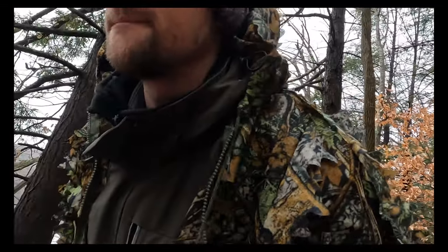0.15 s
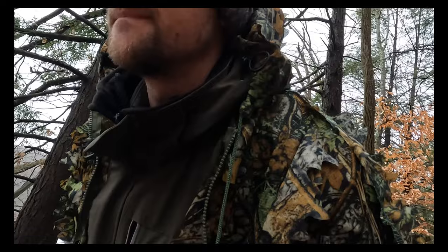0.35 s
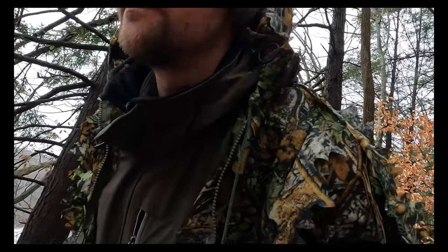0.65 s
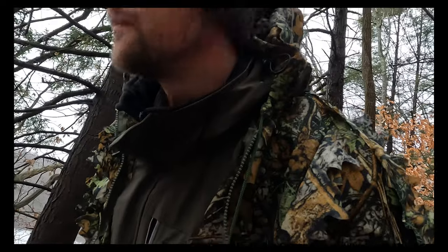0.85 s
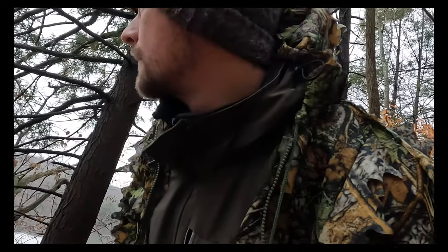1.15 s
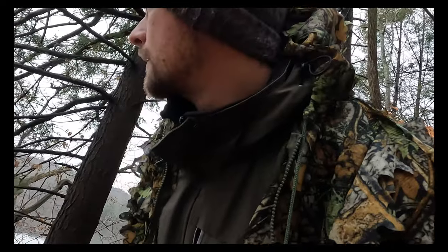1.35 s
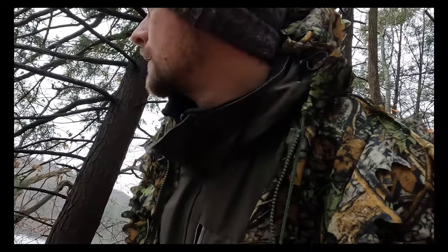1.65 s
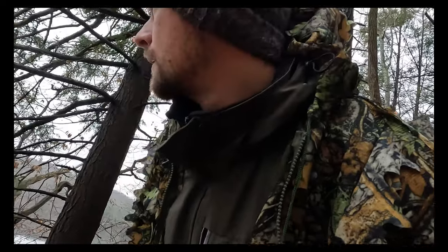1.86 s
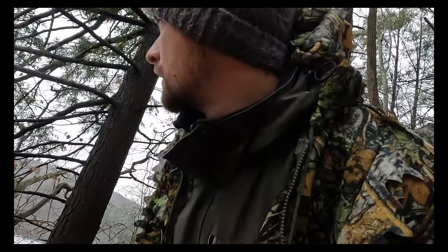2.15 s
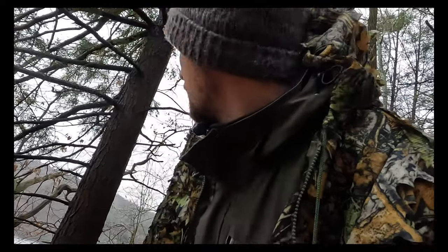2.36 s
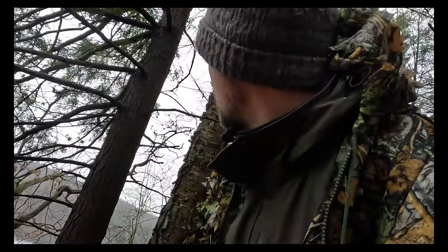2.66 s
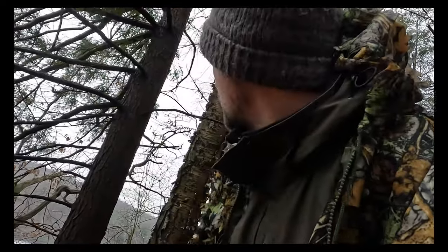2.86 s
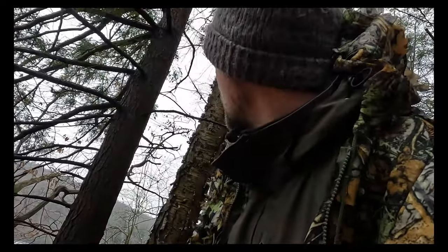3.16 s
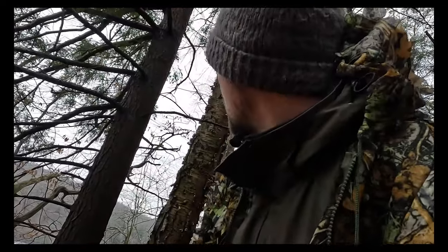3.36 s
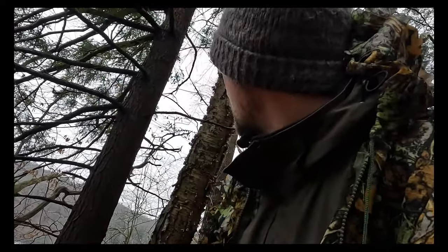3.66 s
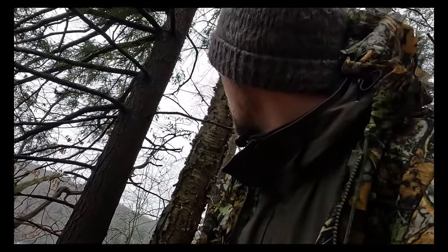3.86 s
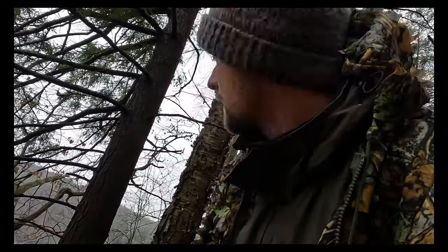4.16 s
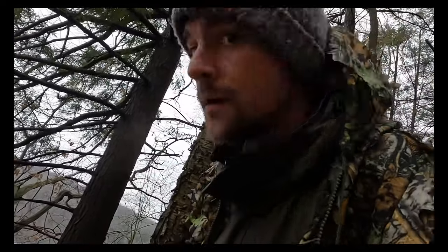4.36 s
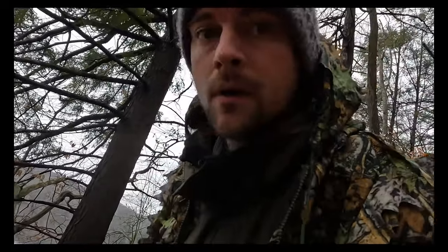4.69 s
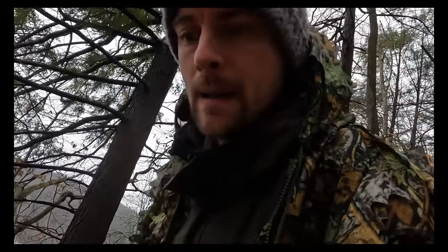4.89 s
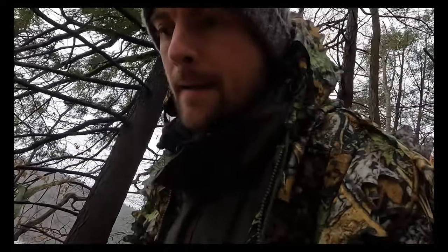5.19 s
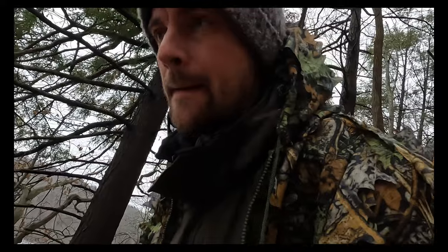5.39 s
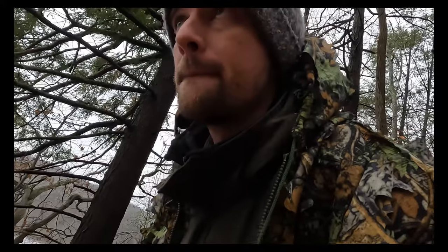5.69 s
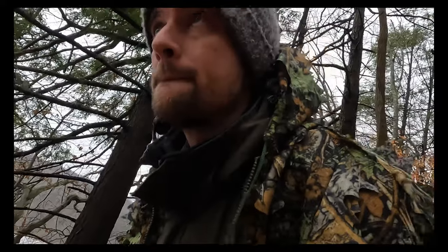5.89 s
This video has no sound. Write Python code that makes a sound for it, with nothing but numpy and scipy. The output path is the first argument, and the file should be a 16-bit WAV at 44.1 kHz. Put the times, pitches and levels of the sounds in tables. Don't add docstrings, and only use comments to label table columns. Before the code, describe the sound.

Stiff jacket fabric rustles and ticks close by while a bird's repeated barking chatter rings among trees, until one hard click near the end.

```python
import sys
import numpy as np
from scipy import signal
from scipy.fft import rfft, irfft, next_fast_len
from scipy.io import wavfile
from scipy.ndimage import uniform_filter1d

SR = 44100
rng = np.random.default_rng(int(sys.argv[2]) if len(sys.argv) > 2 else 0)


def natural_amplitude(level_db):
    exponent = np.asarray(level_db, float) / 20
    return 10 ** exponent


def waveform_to_disk(signal):
    frames = np.transpose(np.atleast_2d(signal))
    scaled = np.clip(frames, -1, 1) * 32767
    samples = np.round(scaled).astype(np.int16)
    wavfile.write(sys.argv[1], SR, samples)


N = 266055


def table(rows, at):
    first, *columns = np.transpose(rows)
    return [np.interp(at, first, column) for column in columns]


def at_hz(points, hz):
    table_hz, level = np.transpose(points)
    return np.interp(np.log(hz), np.log(table_hz), level)


def rms_one(x):
    return x / np.sqrt(np.mean(x ** 2) + 1e-20)


def drift(rate):
    r = np.exp(-80 * np.pi * rate / SR)
    white = rng.standard_normal(N // 40 + 2002)
    slow = signal.lfilter([1], [1, -2 * r, r * r], white)[2000:]
    return np.interp(np.arange(N) / 40, np.arange(len(slow)), rms_one(slow))


def ring(clicks, hz, t60):
    r, w = natural_amplitude(-60 / (t60 * SR)), 2 * np.pi * hz / SR
    return signal.lfilter([0, np.sin(w)], [1, -2 * r * np.cos(w), r * r], clicks + 1e-18)


def sides(pan_db):
    return natural_amplitude(np.multiply.outer([.5, -.5], pan_db))


def filtered(x, order, hz, kind="low"):
    return signal.sosfilt(signal.butter(order, hz, kind, fs=SR, output="sos"), x)


# f/Hz, likeness 0 to 1
EAR_LIKENESS = [(60, 0.99), (150, 1), (360, 0.54), (880, 0.66), (2150, 0.26), (5260, 0.59), (12900, 0.56)]
# f/Hz, left minus right level/dB
EAR_BALANCE = [(60, 0.5), (180, -1), (510, -1.5), (1500, 1), (4400, -0.5), (12900, 7.5)]


def coloured(white, spectrum):
    size = white.shape[1]
    hz = np.arange(1, size // 2 + 2) * SR / size
    mid, side = rfft(white)
    alike = np.clip(at_hz(EAR_LIKENESS, hz), 0, .999)
    pair = np.sqrt(1 + alike) * mid + np.sqrt(1 - alike) * side * [[1], [-1]]
    colour = natural_amplitude(at_hz(spectrum, hz)) * sides(at_hz(EAR_BALANCE, hz))
    return rms_one(irfft(pair * colour, size))


# f/Hz, level/dB per Hz
AIR_COLOUR = [(9, -59), (15, -0.5), (43, 2), (82, -3), (183, -16), (300, -29.5), (430, -43), (600, -41),
              (800, -45.5), (1300, -37.5), (2500, -46), (5000, -53.5), (7800, -60), (8400, -63),
              (11000, -73), (12100, -76), (12800, -73), (13200, -97)]


def air(level_db, swell_db):
    noise = coloured(rng.standard_normal((2, next_fast_len(N))), AIR_COLOUR)[:, :N]
    return natural_amplitude(level_db + swell_db * drift(0.93)) * noise


# t/s, rustle level/dB, dull share level/dB
RUSTLE = [(0.0, -66.5, 8), (0.08, -69.5, 4), (0.39, -66, -5), (0.68, -63.5, -2), (1.01, -65.5, 7),
          (1.35, -73, 6.5), (2.12, -78, -14), (2.3, -69.5, 7), (2.39, -63.5, 9.5), (2.45, -64, 10),
          (2.56, -68, 8), (2.85, -76, 11), (4.15, -78, -3), (4.24, -72.5, 5), (4.29, -68.5, 2),
          (4.33, -67, 7), (4.37, -69, 7), (4.45, -70.5, 8), (4.602, -71, 8.5), (4.721, -68, 13),
          (4.82, -69.5, 9), (5.1, -71.5, 11), (5.35, -69, 8.5), (5.55, -68.5, 13), (5.76, -65, 4.5),
          (5.93, -67, 3)]
# f/Hz, level/dB per Hz
CLOTH_COLOUR = [(180, 6.5), (300, -2), (800, -11), (1300, -2), (2200, -6), (4800, -7.5), (7700, -13.5),
                (8300, -21), (11000, -23), (12300, -26), (13400, -35.5), (14500, -49)]


def jacket(per_s, spread_db, smooth_db):
    level_db, dull_db = table(RUSTLE, np.arange(N) / SR)
    pan_db = 1.5 - 0.3 * dull_db
    size = next_fast_len(N)
    born = rng.random(size) < per_s / SR
    strength = natural_amplitude(spread_db * np.minimum(rng.exponential(1, size), 3))
    grains = born * strength * rng.standard_normal((2, size))
    swish = natural_amplitude(smooth_db) * rng.standard_normal((2, size))
    cloth = coloured(rms_one(grains) + swish, CLOTH_COLOUR)[:, :N]
    dull = filtered(cloth, 2, 1400)
    crisp = cloth - dull
    clumps = natural_amplitude(.6 * drift(9.) + 1.5 * drift(45.))
    return natural_amplitude(level_db + 8.5) * clumps * sides(pan_db) * (crisp + natural_amplitude(dull_db - 3.5) * dull)


# t/s, peak level/dB, left minus right level/dB
NEEDLES = [(0.0912, -68, 8.0), (0.2783, -61, 9.5), (0.3117, -64, 10.0), (0.3117, -48, 15),
           (0.3351, -58, 8.0), (0.4424, -67, 7.5), (0.4648, -62, 8.0), (0.5447, -66, 5.5),
           (0.5611, -59, 6.5), (0.5836, -55, 8.5), (0.625, -56, 4.5), (0.6848, -63, 11.5),
           (0.7337, -57, 4.0), (0.9153, -62.5, 2.5), (1.116, -69, 2.5), (1.1353, -54, 0.5),
           (1.2037, -72, 2.0), (1.3119, -62, 9.0), (1.396, -75, 4.0), (1.482, -71, 4.5), (1.5564, -70, 6.5),
           (1.616, -68, 5.5), (1.8706, -71, 8.5), (2.3421, -55, -1.5), (2.3999, -62, 0.5),
           (2.6628, -67, 0.5), (2.7546, -62, 9.0), (2.8479, -62, 8.0), (3.5698, -74, 8.5),
           (4.1729, -63, 7.0), (4.2028, -69, 6.5), (4.6304, -71, 5.0), (4.9432, -70, 4.5),
           (5.0918, -70, 5.5), (5.1322, -68, 7.5), (5.5064, -72, 5.0), (5.5473, -61, 7.0), (5.6311, -65, 7),
           (5.8331, -58, 6.0), (5.8466, -43, 4.5)]
# t/s, peak level/dB, ring f/Hz
BUMPS = [(.4088, -64, 500), (.583, -57, 555), (.624, -56, 500), (.683, -57, 570), (.733, -61, 450),
         (2.339, -65, 450), (2.392, -53, 496), (2.418, -57, 500), (4.735, -68, 600), (5.1, -59, 510),
         (5.545, -61, 530), (5.63, -63, 448)]


def fibres(needle_db, needle_s, bump_db, cycles):
    length = 900
    out, t = np.zeros((2, N + length)), np.arange(length) / SR
    noise = rng.standard_normal((len(NEEDLES), 2, length)) * np.exp(-t / needle_s)
    noise = filtered(noise, 2, [10500, 14500], "band")
    for (s, db, pan_db), crack in zip(NEEDLES, noise):
        needle = crack / np.abs(crack).max()
        out[:, round(s * SR):][:, :length] += natural_amplitude(db + needle_db) * sides(pan_db + 6.0)[:, None] * needle
    for s, db, hz in BUMPS:
        swell = t * hz * np.exp(-t * hz / cycles)
        out[:, round(s * SR):][:, :length] += natural_amplitude(db + bump_db) * swell * np.sin(2 * np.pi * hz * t)
    return out[:, :N]


# t/s, peak level/dB, ring f/Hz, bright level/dB
COLLAR = [(0.2933, -53, 4000, -71), (0.3043, -46.5, 3080, -71), (0.5831, -43, 3750, -59),
          (0.611, -51, 3590, -70), (0.6245, -40, 3850, -57.5), (0.6786, -41.5, 5030, -62),
          (0.6842, -34, 4500, -57), (1.312, -49, 7300, -69), (1.8714, -59, 4150, -73),
          (2.7546, -53.5, 2030, -72), (2.7896, -50, 2030, -84), (2.8934, -56, 1700, -80),
          (2.8494, -49.5, 3210, -75), (3.214, -53, 2430, -81), (4.1764, -60, 4960, -73),
          (5.5476, -58, 3220, -68), (0.0932, -63, 5000, -68), (0.4678, -62, 5000, -70),
          (0.5197, -67, 5000, -75), (3.6456, -61, 6000, -81), (3.9769, -70, 6100, -88),
          (4.1614, -64, 6030, -79), (4.6304, -60, 5040, -79), (4.9916, -60, 5000, -82),
          (5.9828, -58, 5000, -70)]
# t/s, peak level/dB, ring f/Hz, bright level/dB
CHEST = [(0.37, -49, 6800, -66), (0.4088, -44, 3100, -65), (0.4876, -46, 3530, -61),
         (0.7332, -48, 2380, -57), (0.7564, -49, 3070, -67), (0.7844, -47, 3990, -69),
         (0.825, -41.5, 5240, -63), (1.0404, -50, 2910, -76), (2.6634, -56, 3270, -74),
         (4.202, -58, 2400, -72), (4.3394, -63, 3360, -67), (4.5435, -50.5, 3030, -69),
         (4.7461, -45, 5150, -76), (4.9432, -51, 1600, -76), (5.1352, -46, 5240, -71),
         (5.6316, -46.5, 4470, -59), (5.7748, -48, 2010, -90), (5.834, -55, 2000, -62)]
# t/s, peak level/dB, ring f/Hz, bright level/dB
SLEEVE = [(1.2047, -48, 3900, -81), (2.2925, -46, 4440, -79), (2.3421, -40.5, 4100, -63),
          (2.3833, -44, 4080, -74), (2.392, -38, 4140, -77), (2.4184, -44, 2630, -83)]


def ticks(cycles, bright_db, ring_db, strays):
    length, chest_pan_db, knock_db = 300, 3, -1.5
    out, t = np.zeros((2, N)), np.arange(length) / SR
    rows = []
    for part, pan_db in [(COLLAR, 16), (CHEST, chest_pan_db), (SLEEVE, -7)]:
        rows += [(*row, pan_db) for row in part]
    when = rng.uniform(0, N / SR - .05, strays)
    spread = rng.standard_normal((strays, 3))
    for s, db, (a, b, c) in zip(when, table(RUSTLE, when)[0], spread):
        rows.append((s, db + 10 + 3 * a, 3270 * 0.72 ** b, db - 2 + 4 * c, chest_pan_db + 3 * c))
    cracks = rng.standard_normal((len(rows), 3, length)) * np.exp(-t / 0.0011)
    bright = filtered(cracks[:, :2], 2, [5500, 11000], "band")
    dull = filtered(cracks[:, 2:], 2, [1000, 3200], "band")
    bright, dull = (c / np.abs(c).max(axis=2, keepdims=True) for c in (bright, dull))
    for (s, db, hz, high_db, pan_db), needle, knock in zip(rows, bright, dull):
        start = round((s + .001) * SR)
        tone = np.sin(2 * np.pi * hz * t) * np.exp(-t * hz / cycles)
        tick = natural_amplitude(db + ring_db) * tone + natural_amplitude(high_db + bright_db) * needle + natural_amplitude(db + knock_db) * knock
        out[:, start:start + length] += sides(pan_db)[:, None] * tick
    return out


# t/s, length/s, start f/Hz, end f/Hz, peak level/dB
SQUEAKS = [
    (0.469, 0.032, 1184, 1154, -48),
    (0.48, 0.048, 2315, 1380, -57.5),
]


def squeaks():
    out = np.zeros(N)
    for s, length, start_hz, end_hz, db in SQUEAKS:
        count = round(length * SR)
        phase = 2 * np.pi * np.cumsum(np.linspace(start_hz, end_hz, count)) / SR
        out[round(s * SR):][:count] += natural_amplitude(db) * np.hanning(count) ** 0.3 * np.sin(phase)
    return out


# t/s from the crest, pitch as a share of crest pitch, level/dB
ARCH = [(-.033, .76, -40), (-.030, .77, -30), (-.019, .8, -20), (-.013, .97, -6.), (-.006, 1., -2.),
        (.005, .99, 0.), (.015, .92, 0.), (.024, .80, -6.), (.032, .75, -30)]
# number (multiple of the pitch), level/dB
UPPER = [(3, 1), (4, 10), (5, 5.5), (6, 4), (7, 6)]
# f/Hz, level/dB
THROAT = [(780, 2.5), (900, -8), (1000, 1.5), (2500, 7.5), (3050, 2.5), (3400, 10), (3800, -0.5), (4100, 3),
          (4600, 1), (5100, 6), (5700, -4.5), (7300, -11)]
# t/s, crest against the falling leg level/dB,
# upper partials level/dB, rising leg level/dB, extra into the wood level/dB
TURN = [(.7, -7, -70, -6, 1), (.8, -5.5, -72, -7, -4), (.93, -7, -74, -4, 2), (1.12, -5.5, -71, -2, 1.5),
        (1.23, -4, -69, -5, 0), (1.43, -4.5, -76, 4.5, 0.5), (1.55, -1.5, -75, -3, 0),
        (1.76, -3, -73.5, -6, 0), (1.88, -2.5, -75.5, -4, 1), (2.08, -3, -73, -3, 2.5),
        (2.2, -13, -75, -6, 0), (2.4, -3, -72, -4, 1), (2.51, -2, -72, -5, -1.5), (2.71, 5, -71.5, -3, 1.5),
        (2.83, -0.5, -74, -10, -0.5), (3.03, 2.5, -73.5, 0, 0), (3.15, -1, -74, -10, -1),
        (3.35, -3, -75, -1, 1), (3.49, -2, -72.5, -6, -0.5), (3.71, -2.5, -81, 7, 1),
        (3.84, 1.5, -79, -5, .5), (4.04, 4.5, -81, 3, 1.5), (4.17, -2.5, -79, 4, -0.5),
        (4.38, -0.5, -82, -8, 0.5), (4.5, -11, -76, -8, 1.5), (4.71, -9, -78, -6, 3.5),
        (4.85, 3, -82, -1, 0), (5.06, -4, -80, -8, 3), (5.19, -7.5, -79.5, -12, -1),
        (5.4, -21, -84, -14, 2.5), (5.53, -2.5, -88, -14, 0), (5.74, -9, -88, -6, 5),
        (5.86, -7, -90, -8, 3.5)]
# t/s at the crest, crest f/Hz, level/dB, low opening level/dB, undertone level/dB
LEADS = [(0.695, 1069, -44, -78, -57), (0.931, 1065, -39.5, -51, -58), (1.123, 1039, -39.5, -50, -68),
         (1.434, 1036, -43.5, -54, -73), (1.762, 1026, -45, -50, -69), (2.082, 1044, -61, -60, -65),
         (2.4, 1056, -48, -61, -62), (2.711, 1017, -59.5, -59, -68), (3.029, 1007, -48.5, -59, -79),
         (3.351, 1003, -45.5, -53, -62), (3.709, 1000, -47.5, -69, -62), (4.044, 1013, -49.5, -60, -68),
         (4.377, 1017, -53, -75, -66), (4.71, 987, -53, -49.5, -57), (5.064, 1007, -47.5, -64, -56.5),
         (5.405, 1024, -44, -52, -56.5), (5.735, 1000, -51, -61, -55)]
# t/s at the crest, crest f/Hz, level/dB, low opening level/dB, undertone level/dB
ANSWERS = [(0.799, 1009, -42, -56, -53.5), (1.225, 1023, -39.5, -49, -60), (1.549, 1032, -42.5, -49, -61),
           (1.877, 1045, -44, -49, -69), (2.202, 1063, -53, -69, -63), (2.51, 1033, -50, -69, -61),
           (2.829, 1045, -47, -57, -62.5), (3.153, 1024, -44, -57, -69), (3.488, 1008, -41, -55, -67),
           (3.835, 1012, -48, -73, -63), (4.166, 1022, -47, -63, -68), (4.501, 1019, -40.5, -67, -63),
           (4.852, 1036, -56, -54, -58), (5.189, 1004, -44, -78, -63), (5.527, 994, -48.5, -68, -56),
           (5.858, 1010, -50, -61, -73)]


def calls(waver, flutter_db, fading_db):
    direct, sent = np.zeros(N), np.zeros((3, N))
    u = np.arange(ARCH[0][0], ARCH[-1][0], 1 / SR)
    bend, arch_db = table(ARCH, u)
    bend = uniform_filter1d(bend, size=160)
    arch = natural_amplitude(arch_db)
    open_s, hold_s, fall_db_per_s = -.030, .013, 2600
    outside_s = np.maximum(3 * (open_s - u), u - open_s - hold_s)
    open_db = -fall_db_per_s * np.maximum(outside_s, 0)
    closing = np.where(u > 0, bend ** 7., 1)
    crest = np.clip((bend - .9) / 0.029, 0, 1)
    rising = np.clip((-.006 - u) / .006, 0, 1)
    rough = drift(130.0)
    shake = natural_amplitude(flutter_db * drift(100.0))
    fading = [natural_amplitude(fading_db * (drift(5.2) + 0.15 * drift(71.0))) for _ in UPPER]
    blur = [drift(78.0) for _ in UPPER]
    soften_rad, blur_rad = .2, .8
    for n, (s, hz, second_db, opening_db, first_db) in enumerate(sorted(LEADS + ANSWERS)):
        turn_db, upper_db, rise_db, wood_db = TURN[n][1:]
        at = round((s + u[0]) * SR) + np.arange(len(u))
        pitch = hz * bend * (1 + waver * rough[at])
        phase = 2 * np.pi * np.cumsum(pitch) / SR
        first = natural_amplitude(arch_db + at_hz(THROAT, pitch)) * np.sin(phase)
        clean, broken = 0, 0
        for (k, db), fade, smear in zip(UPPER, fading, blur):
            level = natural_amplitude(db + at_hz(THROAT, k * pitch))
            clean = clean + level * np.sin(k * phase)
            broken = broken + fade[at] * level * np.sin(k * phase + blur_rad * smear[at])
        second = natural_amplitude(second_db + arch_db + turn_db * crest + rise_db * rising) + natural_amplitude(opening_db + open_db)
        hidden = np.clip((-40 - second_db) / 8, 1, 1.8)
        main = shake[at] ** hidden * second * np.sin(2 * phase + soften_rad * blur[0][at])
        upper_level = natural_amplitude(upper_db) * (arch + natural_amplitude(open_db + opening_db / 2 + 16.0))
        direct[at] += main + natural_amplitude(first_db) * first + upper_level * closing * broken
        sent_main = natural_amplitude(-5.5 * crest) * np.sin(2 * phase + blur_rad * blur[1][at])
        sent_upper = natural_amplitude(upper_db / 2 + 12.0 - wood_db) * closing * clean
        whole = arch + natural_amplitude(open_db - 3.5)
        sent_first = natural_amplitude((first_db + 56) * 0.25 - 14.0) * first
        sent[n % 3, at] += natural_amplitude(wood_db) * whole * (sent_main + sent_upper) + sent_first
    return direct, sent * natural_amplitude(-46 - 7 * np.maximum(np.arange(N) / SR - 4.9, 0))


# f/Hz, time to fall 60 dB t/s
WOOD_RING = [(1000, 1.66), (2000, 1.48), (4500, 0.35)]
# t/s, level/dB
NEAR_TRUNKS = [
    (.057, -19.),
    (.105, -22.),
]


def wood(x, alike, near_db, near_t60, grain_db):
    t = np.arange(SR * 3 // 2) / SR
    lumps = natural_amplitude(grain_db * rng.standard_normal((3, len(t) // 100 + 1))).repeat(100, axis=1)
    shared, *own = rng.standard_normal((3, len(t))) * lumps[:, :len(t)]
    noise = np.sqrt(alike) * shared + np.sqrt(1 - alike) * np.array(own)
    tail = 0
    for (_, t60), edges in zip(WOOD_RING, [(600, 1350), (1350, 2700), (2700, 9000)]):
        tail = tail + filtered(noise, 2, edges, "band") * natural_amplitude(-60 * t / t60)
    rise = 1 - np.exp(-(t / .012) ** 2)
    near = natural_amplitude(near_db - 60 * t / near_t60)
    tail = tail * rise * (1 + near) * natural_amplitude(-40.0)
    for s, db in NEAR_TRUNKS:
        tail[:, round(s * SR)] += natural_amplitude(db)
    return signal.fftconvolve(x[None], tail, axes=1)[:, :N]


# t/s, peak level/dB, left minus right level/dB
SNAP = [
    (5.8475, -24.5, 7),
]
# f/Hz, level/dB, time to fall 60 dB t/s
SNAP_RINGS = [(1000, -23, 0.041), (2070, -2, 0.0022), (3410, 1.5, 0.0042), (4500, -1.5, 0.0085),
              (5700, -8, 0.0072), (7070, -5, 0.0071), (9000, -3.5, 0.0013), (12100, -21, .004),
              (15000, -27, .003)]
# t/s at the peak, level/dB, swell t/s, fade t/s
SLIDE = [
    (5.803, -55, 0.0055, 0.0056),
    (5.832, -44.5, 0.019, 0.0053),
    (5.9, -58.5, 0.012, 0.016),
]


def fastener():
    (s, db, pan_db), = SNAP
    click = np.zeros(N)
    click[round(s * SR)] = natural_amplitude(db - 5.5)
    snap = 0
    for k, (hz, level_db, t60) in enumerate(SNAP_RINGS):
        snap = snap + (-1) ** k * natural_amplitude(level_db) * ring(click, hz, t60)
    hiss = ring(rng.standard_normal(N), 5060, 0.0037) + 0.31 * ring(rng.standard_normal(N), 4200, 0.002)
    t, slide = np.arange(N) / SR, 0
    for peak_s, level_db, swell, fade in SLIDE:
        width = np.where(t < peak_s, swell, fade)
        slide = slide + natural_amplitude(level_db - 20 * ((t - peak_s) / width) ** 2)
    return sides(pan_db)[:, None] * snap + sides(1.5)[:, None] * rms_one(hiss) * slide


def scene():
    background = air(level_db=-39.5, swell_db=.7)
    close = jacket(per_s=2500., spread_db=2.0, smooth_db=2.5)
    close = close + fibres(needle_db=-8.0, needle_s=.0012, bump_db=2.0, cycles=1.6)
    close = close + ticks(cycles=1.8, bright_db=10.5, ring_db=2.5, strays=24) + squeaks()
    direct, sent = calls(waver=.003, flutter_db=1.6, fading_db=1.8)
    tails = sum(wood(path, alike=0.53, near_db=5.0, near_t60=0.48, grain_db=5.) for path in sent)
    bird = sides(1.0)[:, None] * direct + tails
    bird[0] = np.roll(bird[0], 1)
    return background + close + bird + fastener()


def roll_off(x):
    return signal.sosfilt(signal.butter(12, 16600, fs=SR, output="sos"), x)


def record(dry):
    mix = filtered(dry, 4, 15000)
    return roll_off(mix)


dry = scene()
out = record(dry)
waveform_to_disk(out)
```